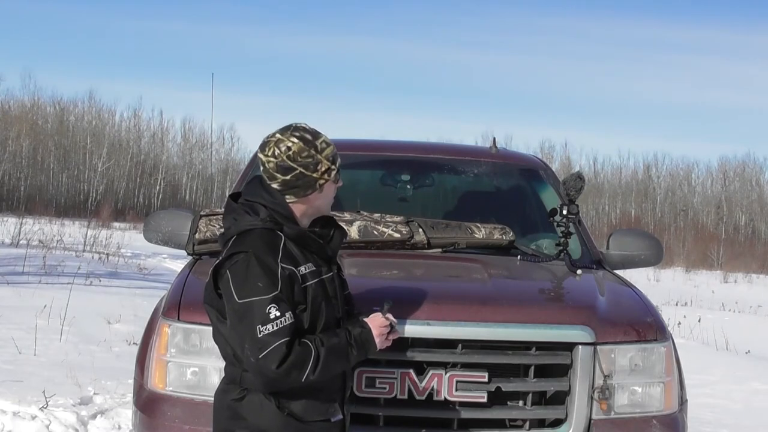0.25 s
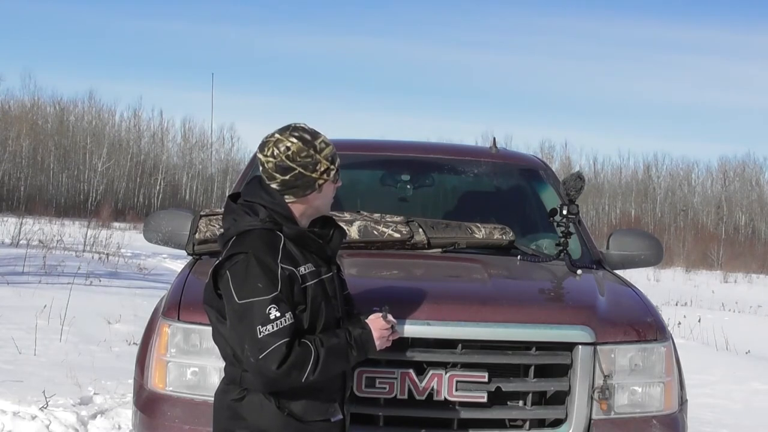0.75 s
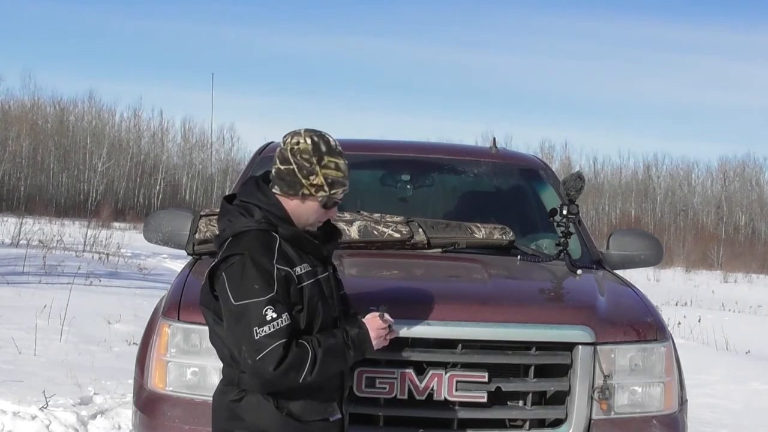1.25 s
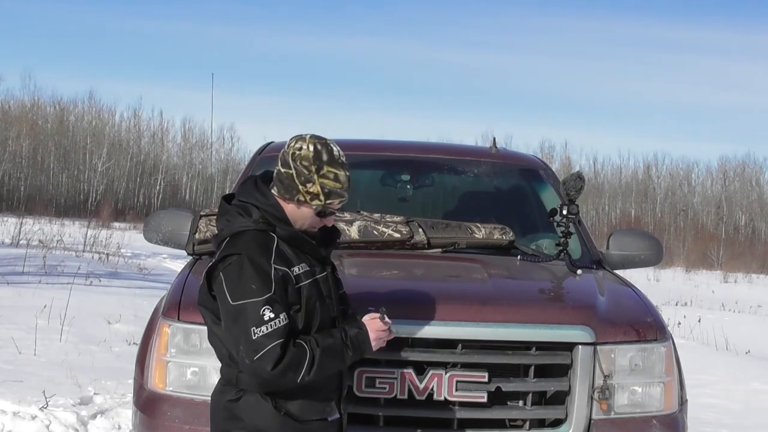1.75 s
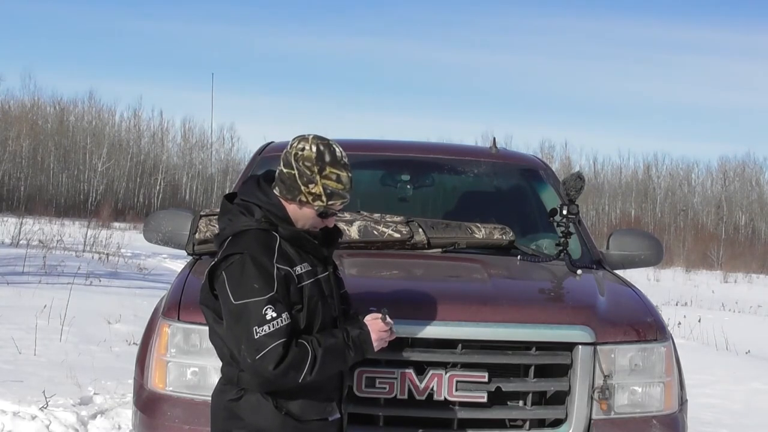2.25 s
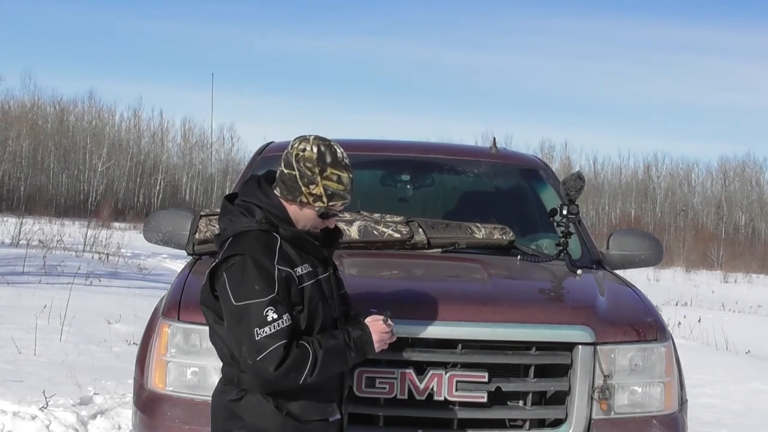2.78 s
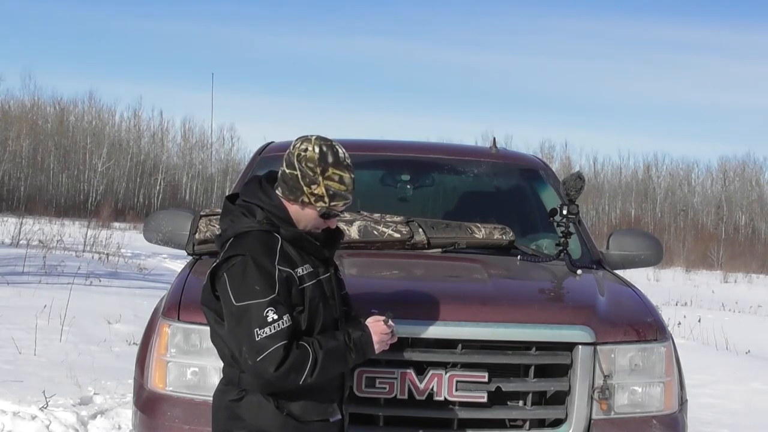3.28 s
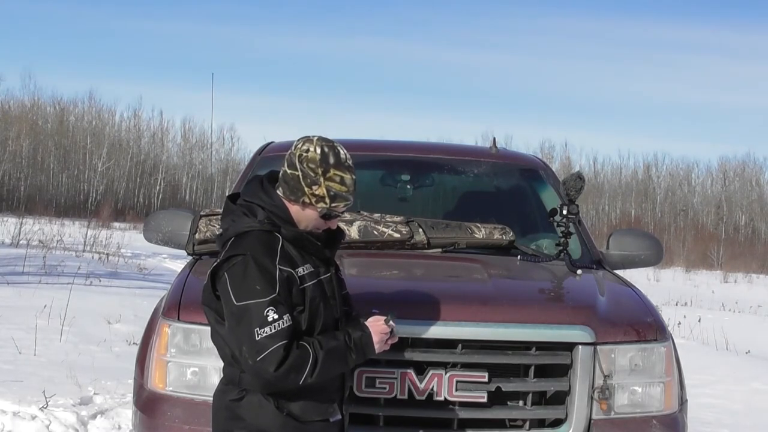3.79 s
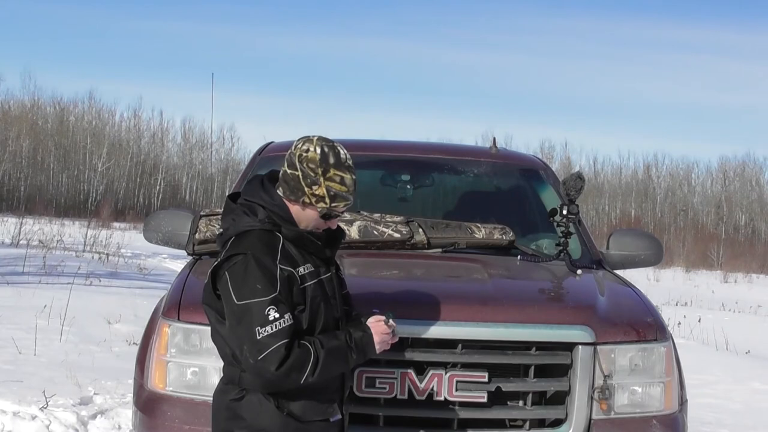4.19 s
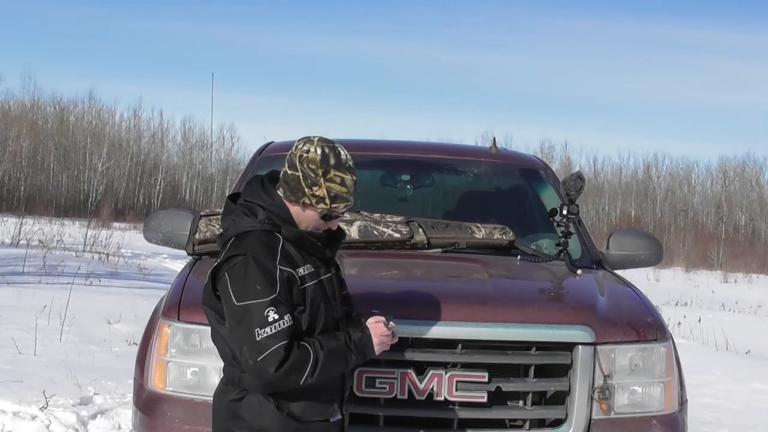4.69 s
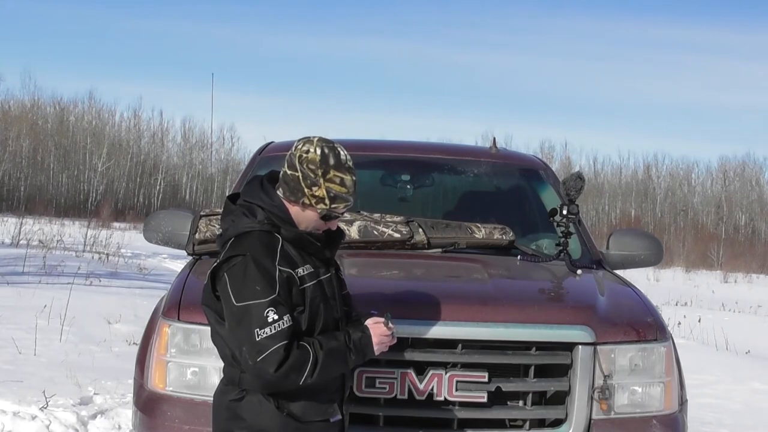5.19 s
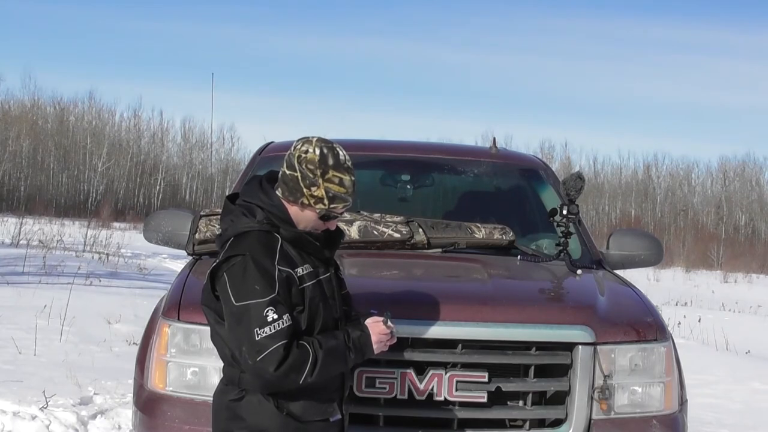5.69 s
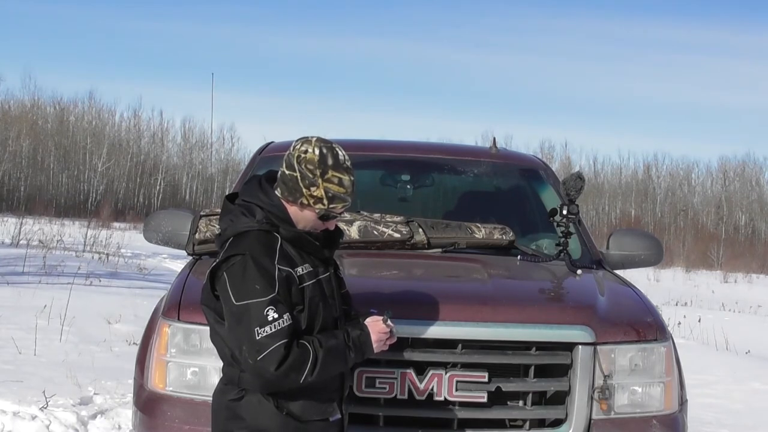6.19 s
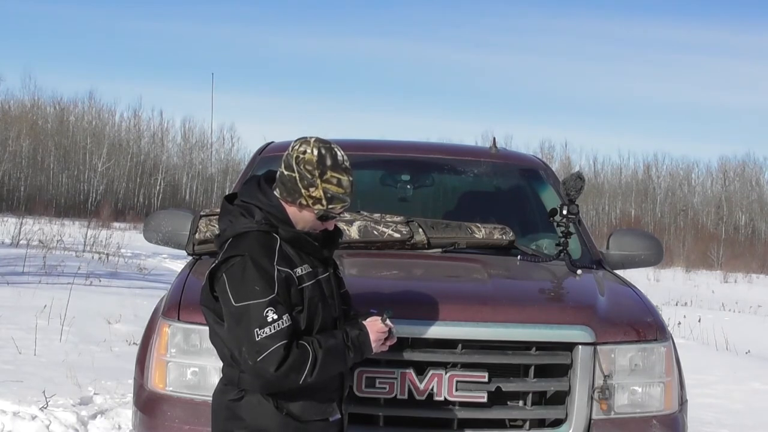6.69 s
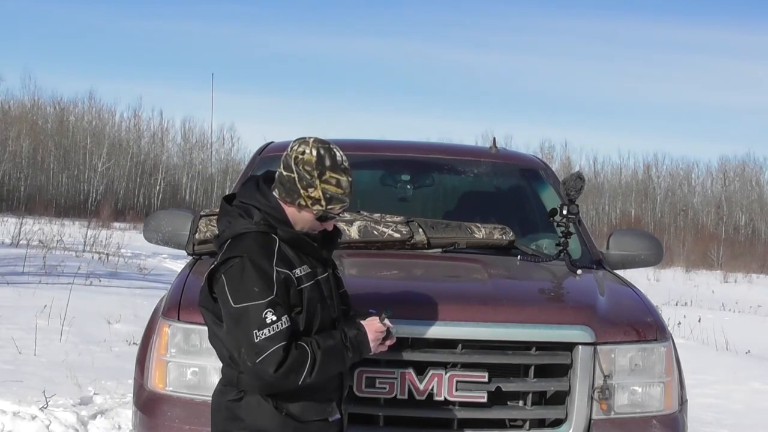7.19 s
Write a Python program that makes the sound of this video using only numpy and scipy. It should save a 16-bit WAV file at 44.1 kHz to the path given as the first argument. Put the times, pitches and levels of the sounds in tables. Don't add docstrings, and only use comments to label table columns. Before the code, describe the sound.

Outdoors in a quiet snowy clearing, a wooden box turkey call is worked by hand near a stereo microphone. Rough, nasal yelps repeat almost four a second, with faint echoes from distant trees. After about five seconds the lid knocks the box, and lighter, higher squeaks follow, each flicking upward. A stiff jacket rustles, creaks and softly thuds throughout, with small clicks on wood near the end.

```python
import sys
import numpy as np
from scipy import signal
from scipy.fft import rfft, irfft, next_fast_len
from scipy.io import wavfile
from scipy.ndimage import uniform_filter1d

SR = 44100
rng = np.random.default_rng(int(sys.argv[2]) if len(sys.argv) > 2 else 0)


def convert_level_to_amplitude(level_db):
    exponent = np.asarray(level_db, float) / 20
    return 10 ** exponent


def generate_wav(signal):
    frames = np.transpose(np.atleast_2d(signal))
    scaled = np.clip(frames, -1, 1) * 32767
    pcm = np.round(scaled).astype(np.int16)
    wavfile.write(sys.argv[1], SR, pcm)


N = 328545

# (start [s], length [s], folds [dB], rumble [dB])
FOLDINGS = [(0, 0.03, -49, -77), (.25, 0.45, -53.5, -79), (.7, 0.34, -58.5, -73), (.98, 0.17, -50.5, -58),
            (1.2, 0.16, -56.5, -70), (1.37, 0.11, -55.5, -58), (1.62, 0.38, -49.5, -59.5),
            (2.02, 0.32, -54.5, -55), (2.36, 0.39, -48.5, -60), (2.79, 0.21, -44, -51),
            (3.1, 0.18, -45, -50.5), (3.32, .14, -53, -50.5), (3.5, 0.42, -47, -57), (3.95, 0.21, -50, -70),
            (4.2, 0.25, -40.5, -53), (4.52, 0.16, -53, -62), (4.71, 0.049, -42.5, -45.5),
            (4.79, 0.085, -48, -48), (5.02, 0.17, -49, -54.5), (5.23, 0.065, -48.5, -56),
            (5.33, 0.043, -54.5, -50), (5.49, 0.34, -45, -61), (5.9, 0.24, -50, -62), (6.18, .12, -49, -58),
            (6.36, 0.062, -52, -52.5), (6.55, 0.11, -57, -53), (6.8, .25, -63, -62), (7.08, .12, -69, -61),
            (7.29, 0.17, -54.5, -51.5)]
# (start [s], length [s], swish [dB], rub [dB])
SLIDES = [(.55, .2, -64.5, -70.5), (.91, 0.23, -57, -68.5), (1.34, .16, -62, -69.5),
          (1.62, 0.4, -58.5, -71.5), (2.08, .3, -60, -71.5), (2.45, 0.41, -53.5, -64.5),
          (2.87, 0.44, -62, -74.5), (3.5, .4, -56.5, -65), (3.92, 0.43, -63.5, -70), (4.2, 0.254, -57, -56),
          (4.71, .035, -60, -56.5), (4.81, 0.023, -66, -61), (5.02, 0.013, -75.5, -64),
          (5.1, .11, -65.5, -64), (5.23, 0.081, -66.5, -63.5), (5.49, 0.016, -63.5, -59),
          (5.62, .14, -57, -52), (5.8, 0.328, -72.5, -65), (6.178, .027, -69.5, -55),
          (6.37, 0.062, -76, -58.5), (6.55, .13, -75, -62), (6.9, 0.056, -62.5, -59.5),
          (7.16, .04, -61.5, -63), (7.22, 0.062, -67, -71), (7.4, 0.065, -70, -62)]
# (folds [dB], rumble [dB], swish [dB], rub [dB])
REST_DB = (-59, -62, -71, -73.5)
GATHER_SHARE, HALT_S = 0.16, 0.016
# (frequency [Hz], density [dB per Hz])
FOLD_SPECTRUM = [(71, -38), (120, -6), (596, -1.5), (1020, -6), (1230, -14.5), (1820, -24), (3000, -32.5),
                 (3900, -33), (6600, -120)]
RUB_SPECTRUM = [(1200, -18.5), (2000, 0.5), (4000, -1), (5300, -9), (7000, 0), (10000, -33)]
SWISH_MID = [(2940, -41.5), (5000, -10.5), (7350, -1), (9000, -3), (10600, -13), (13300, -13), (15800, -14)]
SWISH_SIDE = [(2940, -63), (5000, -31), (5860, -31), (9260, 0.5), (10900, -1.5), (15800, -11.5)]
RUMBLE_SPECTRUM = [(12, -43.5), (20, -18), (53, -4.5), (91, -3.5), (220, -6), (290, -24), (480, -120)]
# (frequency [Hz], left over right [dB])
FOLD_LEAN = [(130, -2.5), (380, -0.5), (1000, 3)]
SWISH_LEAN = [(5000, -1.5), (9000, 7.5), (12500, -5), (15000, 1)]
# (frequency [Hz], width [Hz], level [dB])
DRONE_BAND = [(2060, 310, 0)]
# (start [s], length [s], level [dB], frequency [Hz], width [Hz])
GROANS = [
    (0.091, 0.1, -51, 610, 260),
    (0.31, 0.16, -49, 670, 240),
    (5.7, 0.216, -46.5, 615, 320),
    (5.82, 0.33, -60, 3800, 600),
    (0.11, 0.087, -72.5, 3400, 600),
]

# (start [s], length [s], strength [dB], first slips [per s], later slips [per s])
YELPS = [(0.215, 0.12, -16, 470, 257), (0.508, 0.13, -15, 432, 293), (0.799, 0.1, -22.5, 228, 320),
         (1.025, 0.092, -19.5, 210, 290), (1.239, 0.067, -19, 254, 323), (1.617, 0.1, -14, 397, 284),
         (1.877, 0.099, -11.5, 374, 291), (2.122, 0.096, -11.5, 258, 290), (2.363, 0.11, -14, 219, 237),
         (2.616, 0.098, -13, 250, 257), (2.87, .12, -15, 235, 250), (3.154, .109, -14.5, 245, 300),
         (3.425, .11, -14.5, 213, 253), (3.698, 0.125, -14, 294, 278), (3.973, 0.11, -16, 255, 226),
         (4.243, 0.12, -17.5, 284, 250), (4.516, 0.07, -16.5, 239, 262)]
# (least roughness [0-1], full strength at [share of stroke],
# slip rate turns at [share of stroke], slack after the bite [dB])
GRIP = [(0.1, 0.63, 0.53, -11), (.05, 1, .55, -7.5), (0.3, .65, 0.74, -7.5), (0.8, 0.75, .55, -12),
        (0, 0.53, 0.26, -22), (.5, .64, 0.34, -7.5), (.1, 0.52, .3, -5), (0.2, .63, 0.29, -8.5),
        (.3, 0.68, 0.45, -8.5), (0.2, 0.54, 0.13, -7.5), (.25, 0.6, 0.37, -7.5), (0.8, 0.63, .6, -7.5),
        (.25, .78, 0.14, -7), (0.3, 0.76, .4, -4.5), (0.4, 0.98, 0.092, -3), (.4, 0.66, 0.28, -2),
        (0.4, 0.56, .35, -6)]
GLIDE_SHARES = [.2, .09, .09, .09, .09, .09, .22, .09, .09, .09, .15, .09, .09, .25, .09, .09, .09]
CHALK_DB = [0, 0, 2, 1.5, 2.5, -2, -0.5, 0.5, 2.5, 2, 0.5, 2, 0.5, 0, 1, 3.5, 2]
SMOOTH_SHARE, TURN_SHARE = .45, .09
BITE_DB, BITE_DB_PER_100, FADE_DB = -10, 1.5, -8
ROUGH_START, ROUGH_END = .72, .75
STUMBLE = .5
HURRY_SHARE = .1
CHATTER_HZ = 67.8
# (frequency [Hz], width [Hz], level [dB])
WALL_MODES = [(1190.7, 77.7, 0.5), (1292.5, 105, 1.5), (1443.5, 111, -3)]
CAVITY_MODES = [(1282, 320, 2.5)]
EDGE_MODES = [(3040, 1000, -54), (4180, 520, -50.5), (4700, 390, -45.5), (7070, 1560, -42)]
LID_MODES = [(560, 490, -31), (1956, 990, -34.5), (3200, 1800, -52.5)]
HELD_MODES = [(1288, 220, -1)]
# (frequency [Hz], gain [dB])
SHELF = [(2250, 0), (2450, -7)]
# (frequency [Hz], left over right [dB])
CALL_LEAN = [(700, 2.5), (2400, 2.5), (4400, -4.5), (8000, -1)]
# (frequency [Hz], phase [radians])
PORT_LEAD = [(8900, 0), (10300, -0.5), (11700, 6.5), (13400, 13)]
# (frequency [Hz], t60 [s])
TREE_T60 = [(500, .9), (1300, 1.85), (4000, 1.44)]

# (time [s], peak [dB], frequency [Hz], snap [dB])
CREAKS = [(0.412, -37.5, 564, -24), (0.507, -53.5, 435, -18), (1.39, -37.5, 323, -15),
          (1.444, -41, 396.7, -17.5), (1.817, -36, 840, -7.5), (1.851, -39, 745, -15),
          (2.04, -36.5, 466, -7.5), (2.084, -40.5, 560, -4.5), (2.248, -38.5, 373, -9.5),
          (2.32, -32.5, 405, -10), (2.474, -30.5, 348, -10), (2.763, -40.5, 400, 3),
          (3.19, -30.5, 707, -15), (3.354, -38, 312, -23.5), (3.39, -34.5, 380, -23),
          (3.837, -27.5, 734, -15.5), (4.215, -32, 590, -7), (4.721, -27.5, 226, -16),
          (5.249, -39, 870, -30.5), (5.743, -26, 790, -33.5), (5.905, -38, 620, -16.5),
          (5.937, -28.5, 417, -20.5), (5.994, -34.5, 680, -14), (6.043, -25, 304, -16),
          (6.193, -35.5, 296, -13.5), (6.264, -22.5, 182, -18), (6.37, -30.5, 480, -13),
          (6.385, -30.5, 245, -18.5), (.468, -38.5, 420, -21), (1.001, -40.5, 650, -15.5),
          (1.14, -43, 605, -23), (2.107, -37.5, 455, -22), (2.535, -44.5, 500, -23),
          (2.905, -40.5, 427, -21.5), (3.128, -39, 704, -21), (3.322, -42.5, 344, -22),
          (4.616, -45, 723, -23.5), (5.353, -41, 199, -13), (5.498, -33.5, 785, -18.5)]
# (time [s], peak [dB], left over right [dB])
TICKS = [(0.609, -33.5, -1), (1.5269, -40.5, 2.5), (2.0188, -40.5, 3.5), (2.2745, -44.5, 2.5),
         (2.7655, -31, 6), (3.2932, -53.5, 3), (3.5418, -34, 8.5), (3.906, -42, 2.5), (4.0457, -33.5, -1.5),
         (5.1013, -43.5, 6), (5.4989, -43.5, 6), (5.9077, -48, 0.5), (5.9384, -40, 3.5), (5.9993, -38, 4.5),
         (6.0348, -36.5, 4.5), (6.5777, -45, -0.5), (6.8828, -46, 2.5), (6.9092, -36, 0.5),
         (7.1735, -45.5, -1), (7.415, -43, 1.5)]
# (frequency [Hz], density [dB per Hz])
TICK_SPECTRUM = [(900, -32), (2200, -3), (4000, -3.5), (5200, -7.5), (7000, 2.5), (15000, -13.5)]
# (time [s], peak [dB], frequency [Hz])
THUDS = [(1.079, -50, 102.7), (1.401, -40.5, 104.8), (3.339, -41, 114.9), (3.806, -46, 67.2),
         (4.819, -44.5, 69.5), (5.091, -48, 98), (5.2, -48, 89), (6.036, -44, 146), (6.611, -41, 95.1),
         (6.81, -49, 131.5), (7.1, -46, 132.5)]

# (time [s], peak [dB])
TAPS = [
    (5.024, -45),
    (5.074, -20),
]
# (start [s], length [s], lowest pitch [Hz], last pitch [Hz], strength [dB])
SQUEAKS = [(5.441, 0.035, 877.6, 861, -48.5), (5.565, 0.081, 752.4, 878.7, -39.5),
           (5.744, .063, 703, 850, -39), (6.042, 0.046, 770, 1092, -37), (6.253, 0.069, 830.4, 1003, -37.5),
           (6.472, 0.067, 821, 1065, -36), (6.676, .08, 824, 1062, -36), (6.979, 0.074, 831.5, 1049, -35),
           (7.271, 0.072, 862, 1057, -35.5)]
# (breakaway [dB], held rasp [dB], locked to every second slip [share],
# climb exponent, early under 1)
RASP = [(-53, -46.5, 0.1, 0.89), (-37, -49.5, 0.03, 0.404), (-37, -47.5, 0, 0.495), (-29, -50, 0, 1.6),
        (-35, -40.5, 0.48, 0.204), (-29, -49, 0.2, 0.25), (-29, -47.5, 0, .8), (-26, -41, 0.43, .7),
        (-20, -45.5, 0.47, 0.15)]
# (hand lets up after [s], change [dB], overtones [dB])
LET_UP = [(.03, 1, -3), (0.021, -14.5, -1.5), (0.036, -11, 2.5), (0.046, -3.5, 3.5), (.04, 0, -3),
          (0.02, -1.5, -3.5), (0.1, 0, -1), (0.026, 0.5, -2), (.03, -1, 3)]
# (start [s], length [s], level [dB])
CATCH = (6.503, .027, -26)
DIP_S, DIP_SHARE = .011, .15
FLICK_S, FLICK_SHARE = .014, .4
ONSET_DB, EASE_DB = -12, -3.5
# (frequency [Hz], gain [dB])
LIFT = [(720, -11.5), (850, -2), (950, -2), (1070, 11.5), (1480, 14), (1660, 7), (1850, 0.5), (2100, -11)]
# (frequency [Hz], level [dB])
OVERTONES = [(2300, -14), (3000, -20.5), (3800, -30), (4350, -37), (4750, -19), (5200, -29), (7500, -26),
             (11000, -21)]
# (time [s], peak [dB])
CLACKS = [(5.4983, -44), (5.908, -45), (5.941, -41), (5.9978, -32.5), (6.0345, -34), (6.119, -45.5),
          (6.1972, -41), (6.2537, -37), (6.3725, -41), (6.385, -40)]
# (frequency [Hz], density [dB per Hz])
CLACK_SPECTRUM = [(120, -25), (350, 2), (1200, -5), (3900, 0.5), (4500, -14), (9000, -29)]
# (frequency [Hz], density [dB per Hz])
HISS_SPECTRUM = [(880, -41.5), (1500, -13.5), (2790, -18), (4750, -24.5), (5190, -33), (7180, -4.5),
                 (15800, -4.5)]
TOP_HZ = 15830


def unit(x):
    return x / np.sqrt(np.mean(x ** 2) + 1e-20)


def along(points, hz):
    f, v = np.transpose(points)
    return np.interp(np.log(hz + 1), np.log(f + 1), v)


def curves(rows):
    s, *cols = np.transpose(rows)
    return [np.interp(np.arange(N) / SR, s, c) for c in cols]


def sounding(notes):
    t = np.arange(N) / SR
    return sum((t >= note[0][0]) & (t < note[-1][0]) for note in notes)


def wobble(rate_hz):
    knots = rng.standard_normal(int(N * rate_hz / SR) + 4)
    return np.interp(np.arange(N) * rate_hz / SR, np.arange(len(knots)), knots)


def filtered(x, response):
    m = next_fast_len(N + SR // 2)
    return irfft(rfft(x, m) * response(np.fft.rfftfreq(m, 1 / SR)), m)[..., :N]


def modes(table, f, order=1):
    total = 0
    for k, (hz, width_hz, db) in enumerate(table):
        damping = 1j * f * width_hz
        total = total + (-1) ** k * convert_level_to_amplitude(db) * (damping / (hz * hz - f * f + damping)) ** order
    return total


def leaning(x, table):
    return filtered(x, lambda f: convert_level_to_amplitude([along(table, f) / 2, -along(table, f) / 2]))


def cloth(mid, side, side_db, grain_db, rate_hz):
    clumps = convert_level_to_amplitude(grain_db * wobble(rate_hz) + 0.62 * grain_db * wobble(rate_hz / 5))
    noise = clumps * rng.standard_normal((2, N))
    m, s = filtered(noise, lambda f: convert_level_to_amplitude([along(mid, f), along(side, f)]))
    m, s = unit(m), convert_level_to_amplitude(side_db) * unit(s)
    return np.array([m + s, m - s])


def moves(rows, rest_db):
    t = np.arange(N) / SR
    power = convert_level_to_amplitude(2 * np.array(rest_db))[:, None] * np.ones(N)
    for s, length, *db in rows:
        end = s + length + HALT_S
        a, b = round(s * SR), round(end * SR)
        build = (t[a:b] - s) / (GATHER_SHARE * length)
        halt = (end - t[a:b]) / HALT_S
        shape = np.clip(np.minimum(build, halt), 0, 1)
        power[:, a:b] += convert_level_to_amplitude(2 * np.array(db))[:, None] * shape ** 2
    return 10 * np.log10(power)


def jacket():
    folds_db, rumble_db = moves(FOLDINGS, REST_DB[:2])
    swish_db, rub_db = moves(SLIDES, REST_DB[2:])
    folds = convert_level_to_amplitude(folds_db + 1.0) * cloth(FOLD_SPECTRUM, FOLD_SPECTRUM, side_db=-5.0, grain_db=3.5, rate_hz=110)
    rub = convert_level_to_amplitude(rub_db + 4.0) * cloth(RUB_SPECTRUM, RUB_SPECTRUM, side_db=-13.5, grain_db=2.5, rate_hz=150)
    swish = convert_level_to_amplitude(swish_db + 1.5) * cloth(SWISH_MID, SWISH_SIDE, side_db=1.0, grain_db=3.5, rate_hz=450)
    rumble = cloth(RUMBLE_SPECTRUM, RUMBLE_SPECTRUM, side_db=-1.0, grain_db=4.5, rate_hz=16)
    rumble = convert_level_to_amplitude(rumble_db - 1.5) * rumble
    return leaning(folds + rub, FOLD_LEAN) + leaning(swish, SWISH_LEAN) + rumble


def drone():
    noise = convert_level_to_amplitude(2.5 * wobble(4.5)) * rng.standard_normal((2, N))
    band = filtered(noise, lambda f: modes(DRONE_BAND, f, order=2))
    near, wide = convert_level_to_amplitude(-74) * unit(band)
    return np.array([near + .4 * wide, near - .4 * wide])


def groans():
    out, grains = np.zeros(N), convert_level_to_amplitude(5.5 * wobble(90)) * rng.standard_normal(N)
    for s, length, db, hz, width_hz in GROANS:
        a, n = round(s * SR), round(length * SR)
        b, c = signal.iirpeak(hz, hz / width_hz, SR)
        band = signal.lfilter(b, c, signal.lfilter(b, c, grains[a:a + n]))
        swell = np.clip(2 - 2 * np.linspace(-1, 1, n) ** 2, 0, 1)
        out[a:a + n] += convert_level_to_amplitude(db) * swell * unit(band)
    return out * convert_level_to_amplitude([[1], [-1]])


def box(f):
    return modes(WALL_MODES, f) * modes(CAVITY_MODES, f) * convert_level_to_amplitude(along(SHELF, f))


def lid(f):
    return modes(LID_MODES, f, order=2) * convert_level_to_amplitude(along(SHELF, f))


def edge(f):
    return modes(EDGE_MODES, f, order=2)


def stroke(s, length, db, first, later, grip, full_at, turn_at, slack_db, glide):
    at = np.linspace(0, 1, num=21)
    bite_db = BITE_DB + BITE_DB_PER_100 * (first - 200) / 100
    level_at = [.06, .22, np.clip(full_at, .3, .84), .87, 1]
    level_db = db + np.interp(at, level_at, [bite_db, slack_db, 0, -1.5, FADE_DB])
    rough = np.interp(at, [0, SMOOTH_SHARE, .85], [ROUGH_START, grip, ROUGH_END])
    stumble = STUMBLE * abs(np.log(first / later)) * (TURN_SHARE / glide) ** 2
    rough += stumble * np.clip(1.5 - abs(at - turn_at) / glide, 0, 1)
    rate = np.interp(at, [turn_at - glide, turn_at + glide], [first, later])
    rate = rate * np.interp(at, [.65, .9], [1, 1 + HURRY_SHARE])
    return np.transpose([s + length * at, level_db, rate, rough])


def yelps():
    notes = [stroke(*row, *grip, glide) for row, grip, glide in zip(YELPS, GRIP, GLIDE_SHARES)]
    level_db, rate, rough = curves(np.vstack(notes))
    on, rough, t = sounding(notes), np.clip(rough, 0, 1), np.arange(N) / SR
    starts, ends = np.array([(note[0][0], note[-1][0]) for note in notes]).T
    note = np.minimum(np.searchsorted(ends, t), len(ends) - 1)
    since, left = t - starts[note], ends[note] - t - .004

    turns = np.cumsum(on * rate * (1 + .12 * rough ** 2 * wobble(120))) / SR
    turns -= np.interp(starts, t, turns)[note] + 1e-6
    at = np.flatnonzero(np.diff(np.floor(turns)) > 0)
    chance = np.clip(rng.standard_normal((2, N))[:, at], -1.7, 1.7)
    period = SR / rate[at]
    late = .22 * rough[at] ** 2 * np.abs(chance[0]) * (turns[at] > 0) * period
    slips = np.zeros(N)
    np.add.at(slips, at + 1 + late.astype(int), np.sqrt(period) * convert_level_to_amplitude(2.1 * rough[at] * chance[1]))
    scrape = unit(rng.standard_normal(N) * np.exp(-2.5 * (turns % 1)))

    bounce = np.clip(1.2 - left / .045, 0, 1) * np.sin(np.pi * CHATTER_HZ * left) ** 2
    force = on * convert_level_to_amplitude(level_db + 19.5) * (1 - .85 * bounce)
    grit = force * convert_level_to_amplitude(.4 * (level_db + 18) + np.take(CHALK_DB, note))
    grit = grit * np.clip(0.53 + since / 0.045, 0, 1)
    lid_force = force * slips * np.clip(0.62 + since / .07, 0, 1)
    ring = filtered(force * (slips + 0.39 * rough ** 2 * scrape), box)
    return ring + filtered(lid_force, lid) + filtered(0.13 * force * slips + grit * scrape, edge)


def placed(f):
    mirror = 1 + convert_level_to_amplitude(-17.5) * np.exp(-2j * np.pi * f * .0085)
    lean_db = along(CALL_LEAN, f) / 2
    return mirror * [convert_level_to_amplitude(lean_db), convert_level_to_amplitude(-lean_db) * np.exp(1j * along(PORT_LEAD, f))]


def trees(x):
    hz, t, z = signal.stft(rng.standard_normal((2, SR)), SR, nperseg=256)
    decay = convert_level_to_amplitude(-60 * t / along(TREE_T60, hz)[:, None]) * (1 - np.exp(-t / .06))
    tail = signal.istft(z * decay, SR, nperseg=256)[1]
    near, wide = tail / np.linalg.norm(tail[0])
    return signal.fftconvolve(x[None], [near + 0.23 * wide, near - 0.18 * wide], axes=1)[:, :N]


def creaks():
    out, t = np.zeros((3, N + SR)), np.arange(SR // 20) / SR
    for s, db, hz, snap_db in CREAKS:
        pop = 2.22 * np.sin(2 * np.pi * hz * t) * convert_level_to_amplitude(-60 * t / 0.025) * (1 - np.exp(-t / 0.0019))
        puff, *snap = rng.standard_normal((3, len(t)))
        puff = 3 * puff * convert_level_to_amplitude(-60 * t / 0.054)
        snap = snap * convert_level_to_amplitude(snap_db + 1.0 - 60 * t / 0.081)
        out[:, round(s * SR):][:, :len(t)] += convert_level_to_amplitude(db) * np.array([pop + puff, *snap])

    def snap_colour(f):
        swish = convert_level_to_amplitude([along(SWISH_MID, f), along(SWISH_SIDE, f)])
        return swish + [convert_level_to_amplitude(along(RUB_SPECTRUM, f) - 10.5), 0 * f]

    dull = filtered(out[0], lambda f: modes([(410, 790, 0.0035)], f, order=2))
    mid, side = filtered(out[1:], snap_colour)
    return np.array([mid + side, mid - side])[:, :N] + 1.05 * leaning(dull[:N], FOLD_LEAN)


def ticks():
    out, t = np.zeros((2, N + SR)), np.arange(SR // 40) / SR
    for s, db, pan_db in TICKS:
        click = convert_level_to_amplitude(db - 4.0 - 60 * t / 0.012) * rng.standard_normal(len(t))
        out[:, round(s * SR):][:, :len(t)] += click * convert_level_to_amplitude([[pan_db / 2], [-pan_db / 2]])
    return filtered(out[:, :N], lambda f: convert_level_to_amplitude(along(TICK_SPECTRUM, f)))


def thuds():
    out, t = np.zeros(N + SR), np.arange(SR // 5) / SR
    swell = t / 0.018 * np.exp(1 - t / 0.015)
    for s, db, hz in THUDS:
        sag = np.sin(2 * np.pi * hz * (1.128 * t - 1.87 * t ** 2))
        out[round(s * SR):][:len(t)] += convert_level_to_amplitude(db) * swell * sag
    return out[:N] * convert_level_to_amplitude(4.5 * wobble(70)) * convert_level_to_amplitude([[-1], [1]])


def taps():
    blows = np.zeros(N)
    for s, db in TAPS:
        blows[round(s * SR)] = convert_level_to_amplitude(db + 41.5)

    def struck(f):
        return convert_level_to_amplitude(-8.5) * box(f) + modes(HELD_MODES, f, order=2) + lid(f) + convert_level_to_amplitude(-1) * edge(f)

    return filtered(blows, struck)


def chirp(s, length, low_hz, last_hz, db, break_db, held_db, share, early, ease_s, ease_db, over_db):
    t = np.linspace(0, length, num=17)
    rise = np.clip((t - DIP_S) / (length - DIP_S), 0, 1) ** early
    flick = np.clip(1 - (length - t) / FLICK_S, 0, 1)
    climb = (1 - FLICK_SHARE) * rise + FLICK_SHARE * flick
    hz = low_hz * (1 + DIP_SHARE * np.clip(1 - t / DIP_S, 0, 1)) + (last_hz - low_hz) * climb
    effort_db = db + np.interp(t, [0, DIP_S, length], [ONSET_DB, 0, EASE_DB])
    effort_db = effort_db + ease_db * np.clip((t - ease_s) / DIP_S, 0, 1)
    first_db, second_db = effort_db + along(LIFT, hz), effort_db + along(LIFT, 2 * hz)
    rasp_db = np.interp(t, [0, .022], [break_db, held_db])
    return np.transpose([s + t, hz, first_db, second_db, rasp_db, share + 0 * t, over_db + 0 * t])


def squeaks():
    notes = [chirp(*row, *rasp, *ease) for row, rasp, ease in zip(SQUEAKS, RASP, LET_UP)]
    pitch_hz, first_db, second_db, rasp_db, share, over_db = curves(np.vstack(notes))
    on = uniform_filter1d(sounding(notes) * 1., size=130)
    phase = 2 * np.pi * np.cumsum(pitch_hz * (1 + .013 * wobble(250) + .007 * wobble(45))) / SR
    low = convert_level_to_amplitude(first_db + 2.5 * wobble(110)) * np.sin(phase)
    low = low + convert_level_to_amplitude(second_db + 3.5 * wobble(110)) * np.sin(2 * phase)
    high = 0
    for k in range(3, 10):
        high = high + convert_level_to_amplitude(along(OVERTONES, k * pitch_hz) + 4.5 * wobble(90)) * np.sin(k * phase)
    effort = convert_level_to_amplitude(np.minimum(second_db, first_db + 4.5))

    share, (s, length, db) = np.clip(share, 0, 1), CATCH
    place = 2 * (np.arange(N) / SR - s) / length - 1
    catch = convert_level_to_amplitude(db - rasp_db) * np.clip(2 - 2 * place ** 2, 0, 1)
    halfway = np.sqrt(2) * (np.sqrt(share) + catch) * np.sin(3 * phase / 2)
    rasp = np.sqrt(1 - share) * convert_level_to_amplitude(24.0) * rng.standard_normal(N)
    grit = filtered(on * effort * convert_level_to_amplitude(33.5) * rng.standard_normal(N), edge)
    tone = np.sqrt(2) * (low + effort * convert_level_to_amplitude(over_db) * high) + convert_level_to_amplitude(rasp_db) * halfway
    return on * tone + filtered(on * convert_level_to_amplitude(rasp_db) * rasp, box) + grit


def clacks():
    out, t = np.zeros(N + SR), np.arange(SR // 40) / SR
    for s, db in CLACKS:
        rattle = convert_level_to_amplitude(-60 * t / 0.013) * rng.standard_normal(len(t)) + 3 * (t == 0)
        out[round(s * SR):][:len(t)] += convert_level_to_amplitude(db + 4.5) * rattle
    return filtered(out[:N], lambda f: convert_level_to_amplitude(along(CLACK_SPECTRUM, f))) * convert_level_to_amplitude([[1.5], [-1.5]])


def scene():
    clothing = jacket() + groans() + creaks() + ticks() + thuds()
    call = yelps() + taps() + squeaks()
    near = convert_level_to_amplitude(-0.28) * filtered(call, placed) + convert_level_to_amplitude(-33.5) * trees(call)
    return clothing + drone() + near + clacks()


def low_pass(x):
    return signal.sosfilt(signal.butter(12, 16740, fs=SR, output="sos"), x)


def record(dry):
    hiss = convert_level_to_amplitude(-63.0) * cloth(HISS_SPECTRUM, HISS_SPECTRUM, side_db=-11.5, grain_db=-0.6, rate_hz=21)
    mix = filtered(dry + hiss, lambda hz: hz < TOP_HZ)
    return low_pass(mix)


dry = scene()
out = record(dry)
generate_wav(out)
```